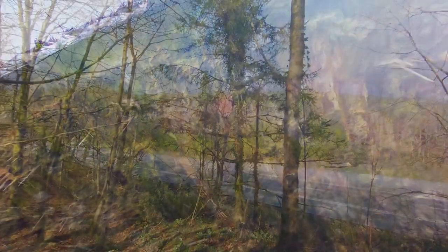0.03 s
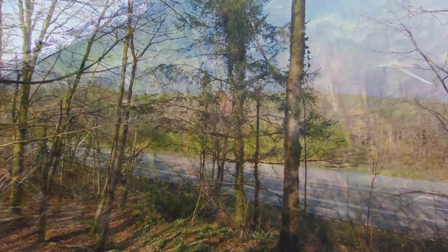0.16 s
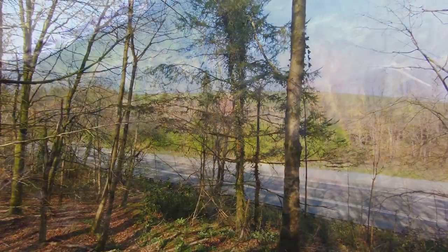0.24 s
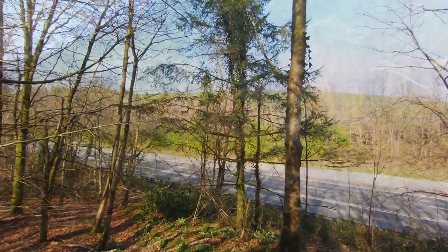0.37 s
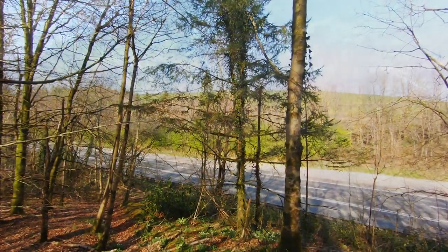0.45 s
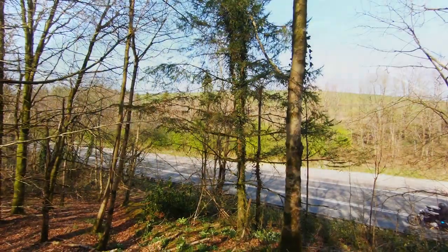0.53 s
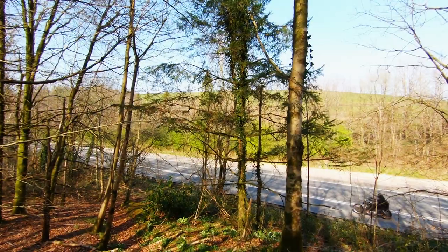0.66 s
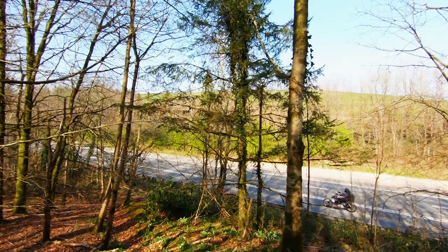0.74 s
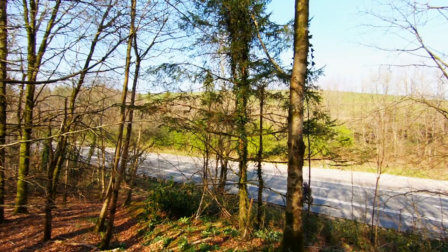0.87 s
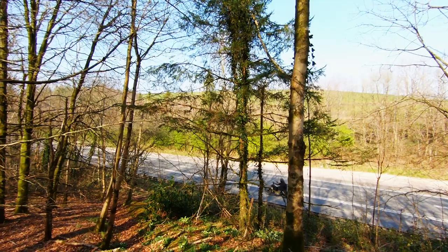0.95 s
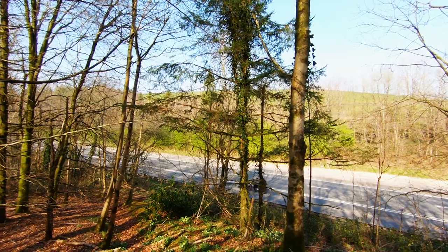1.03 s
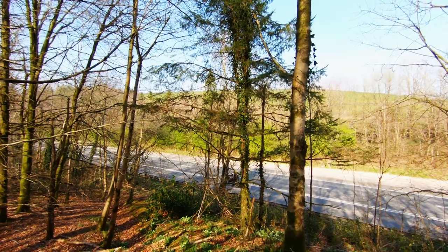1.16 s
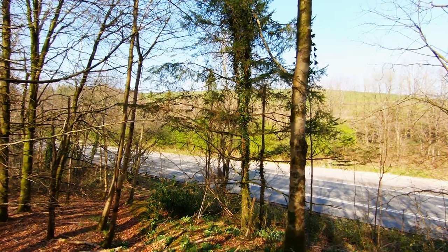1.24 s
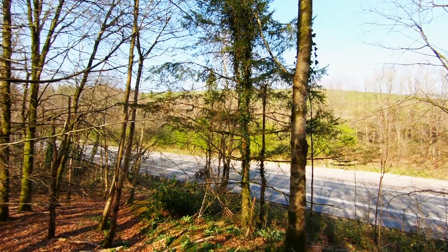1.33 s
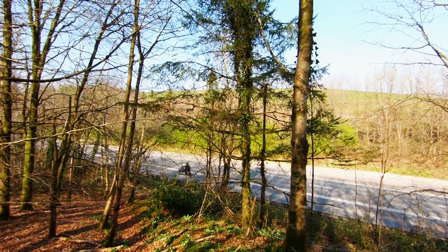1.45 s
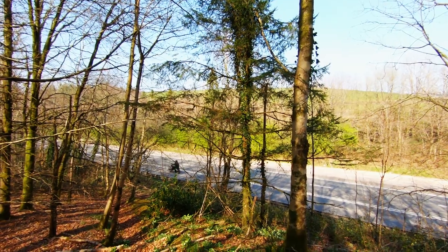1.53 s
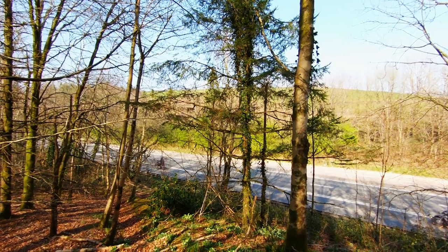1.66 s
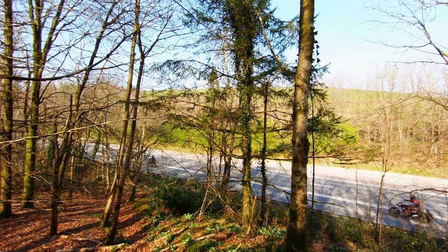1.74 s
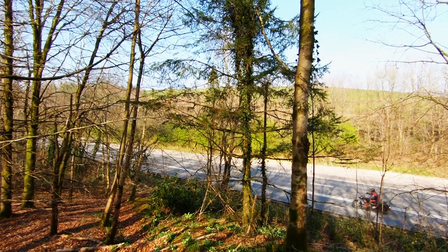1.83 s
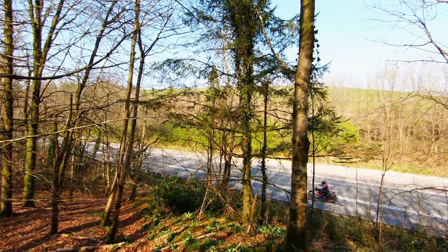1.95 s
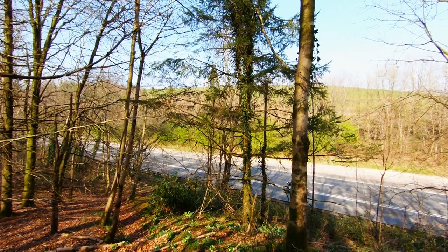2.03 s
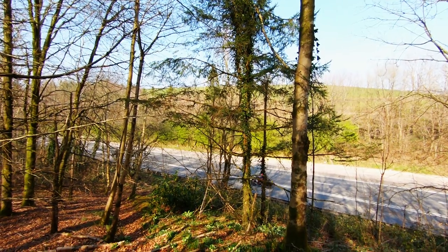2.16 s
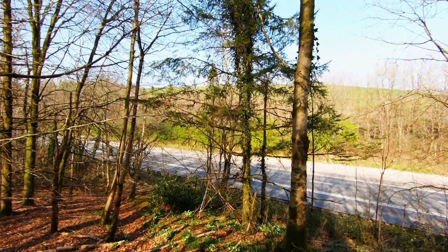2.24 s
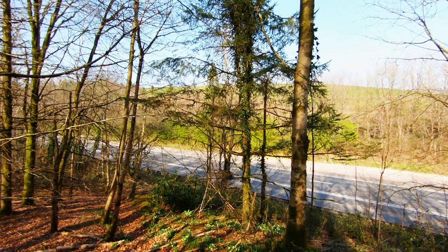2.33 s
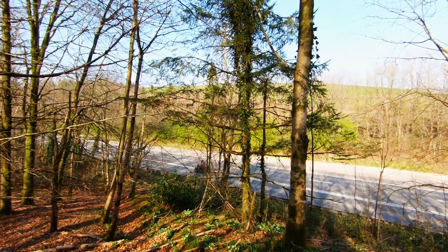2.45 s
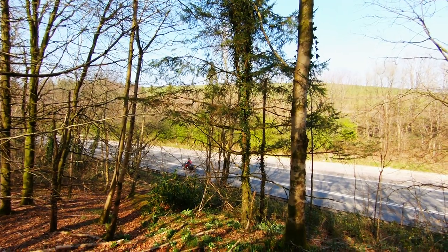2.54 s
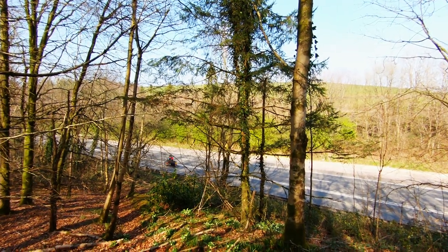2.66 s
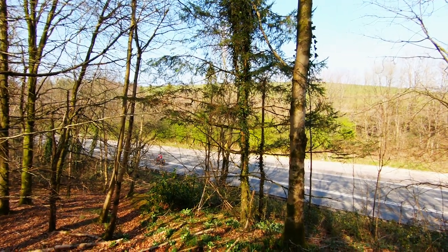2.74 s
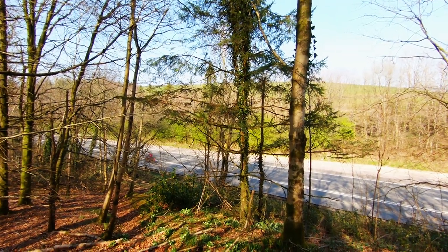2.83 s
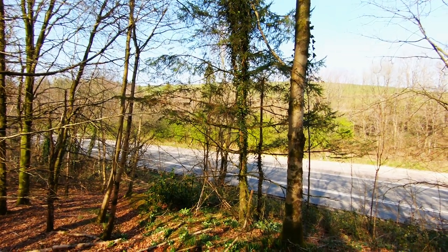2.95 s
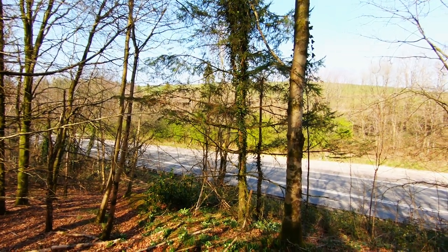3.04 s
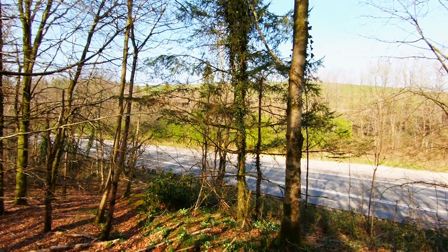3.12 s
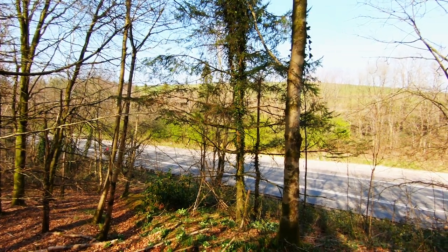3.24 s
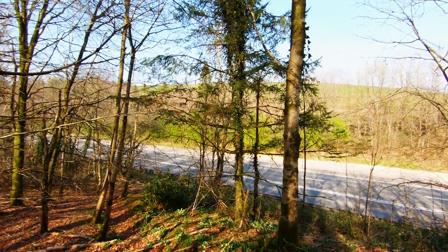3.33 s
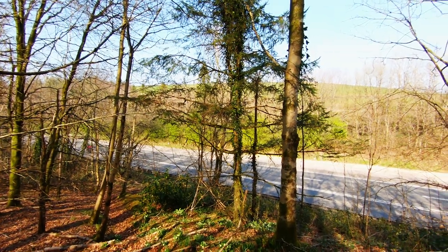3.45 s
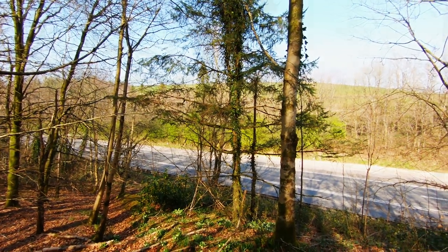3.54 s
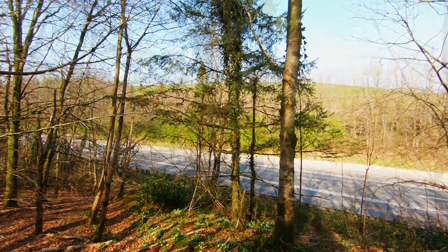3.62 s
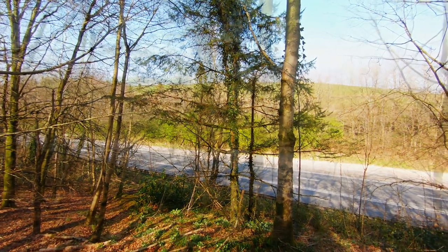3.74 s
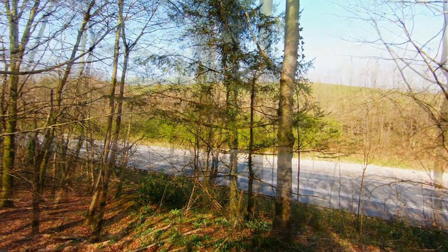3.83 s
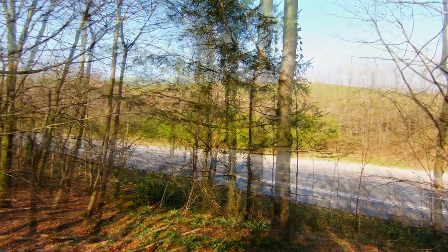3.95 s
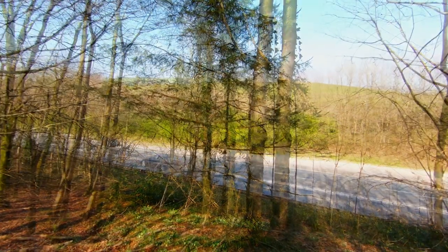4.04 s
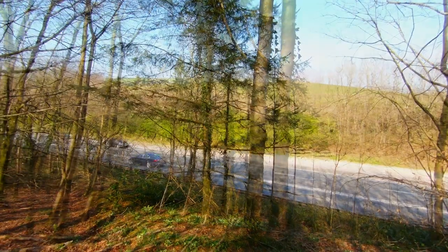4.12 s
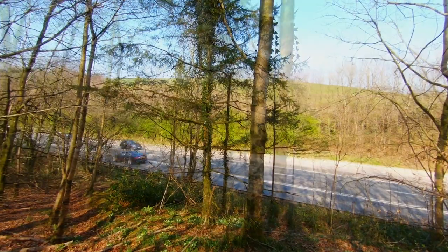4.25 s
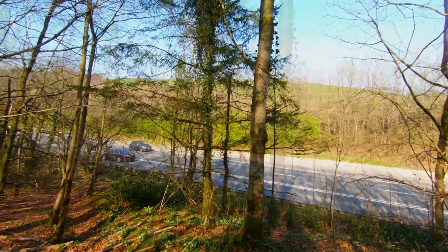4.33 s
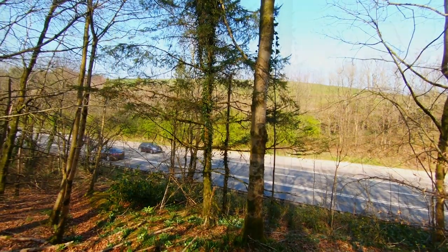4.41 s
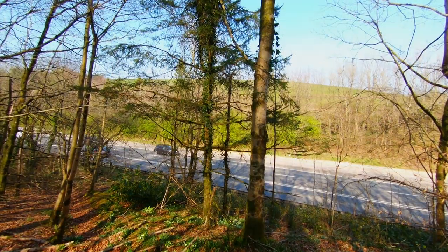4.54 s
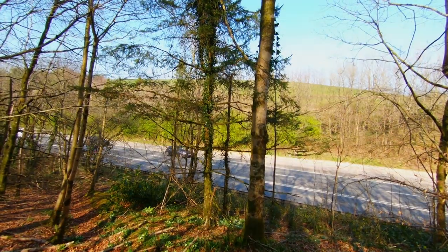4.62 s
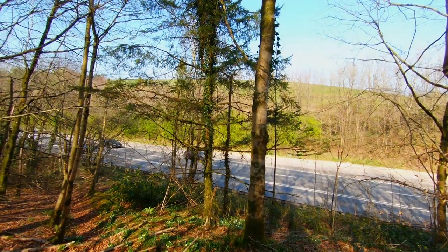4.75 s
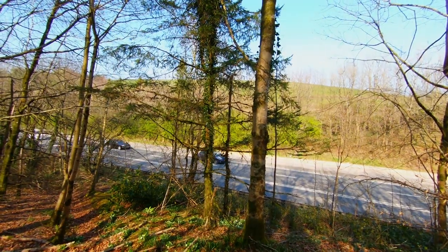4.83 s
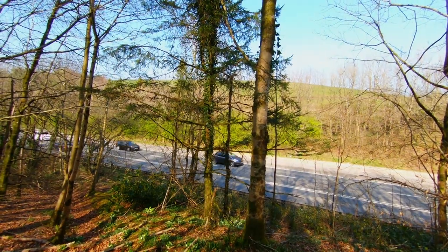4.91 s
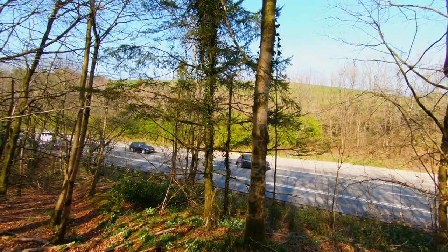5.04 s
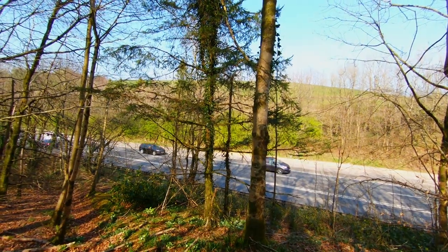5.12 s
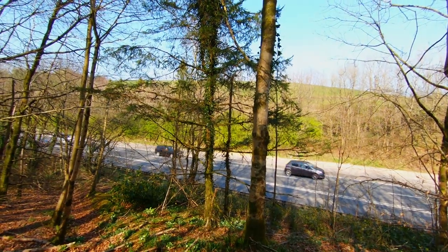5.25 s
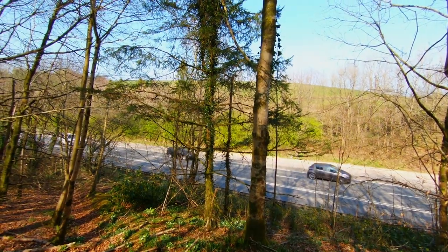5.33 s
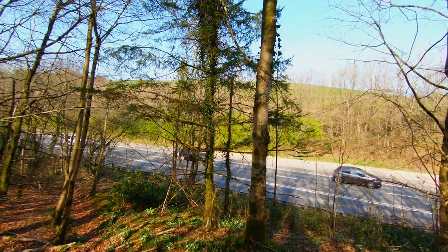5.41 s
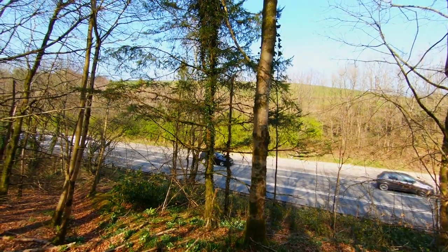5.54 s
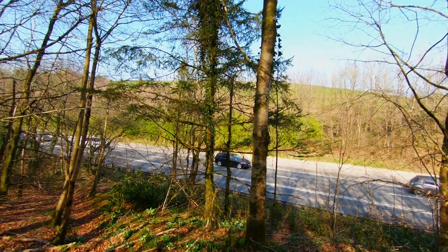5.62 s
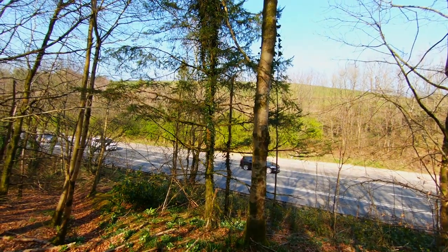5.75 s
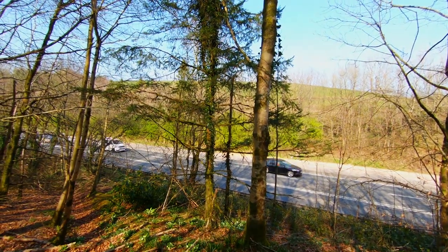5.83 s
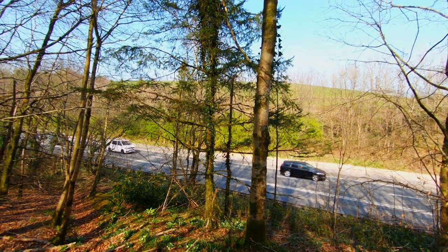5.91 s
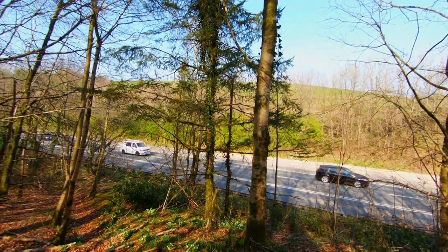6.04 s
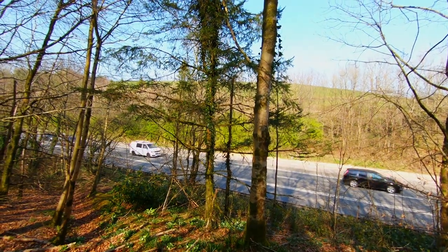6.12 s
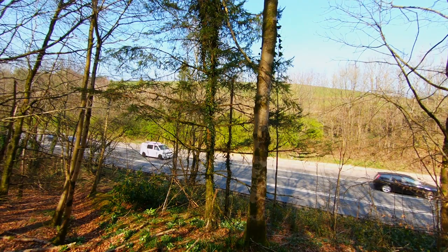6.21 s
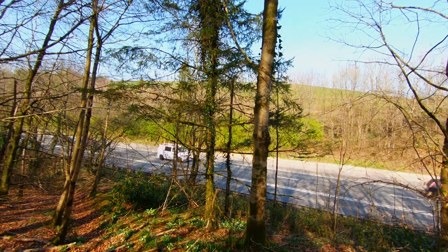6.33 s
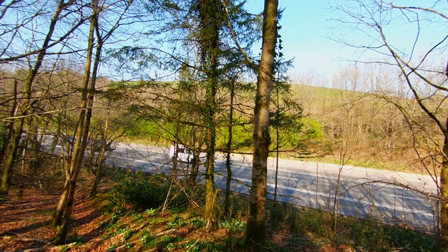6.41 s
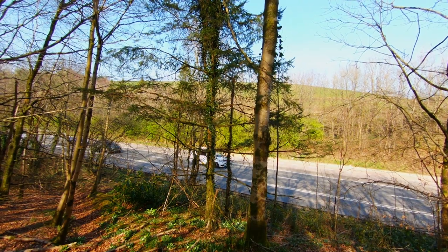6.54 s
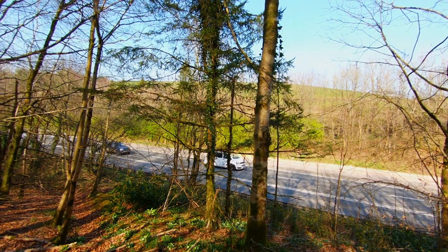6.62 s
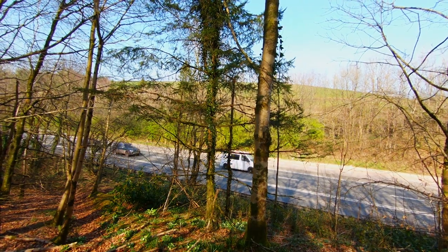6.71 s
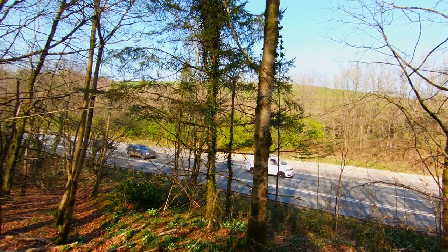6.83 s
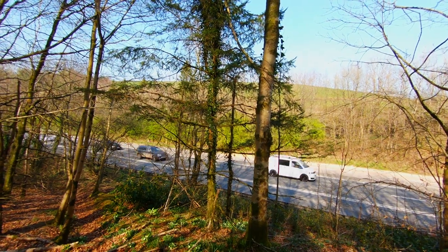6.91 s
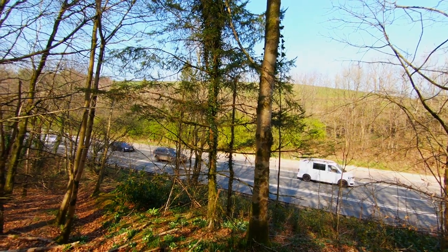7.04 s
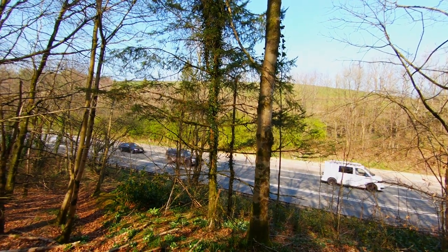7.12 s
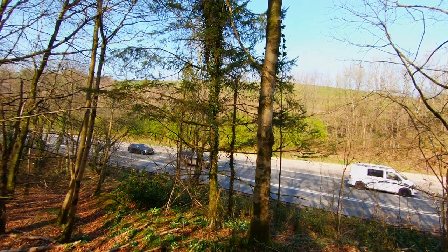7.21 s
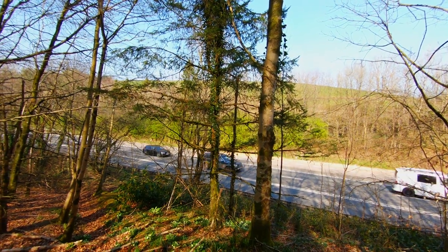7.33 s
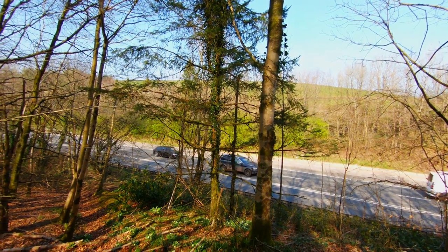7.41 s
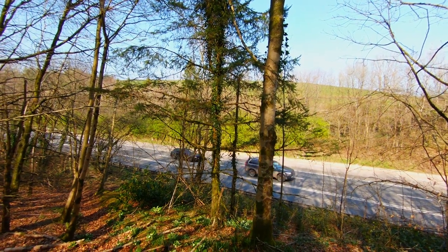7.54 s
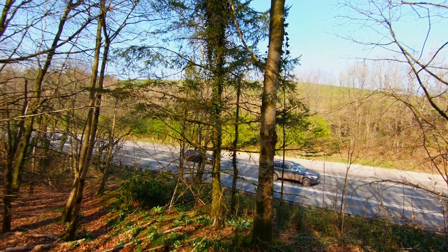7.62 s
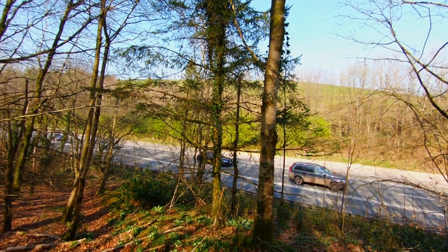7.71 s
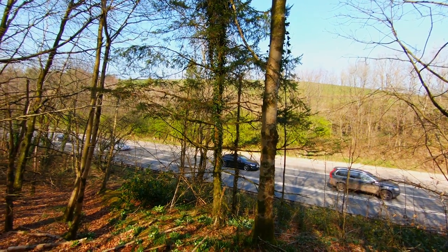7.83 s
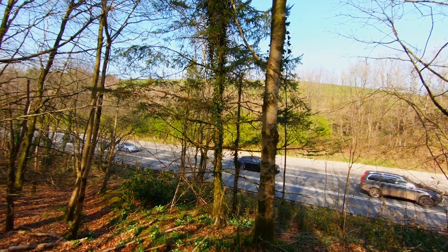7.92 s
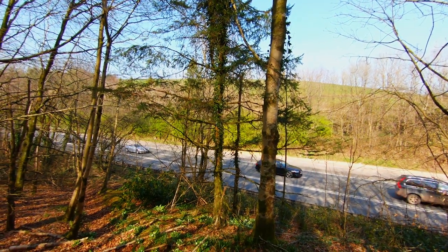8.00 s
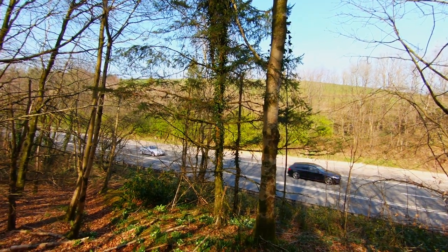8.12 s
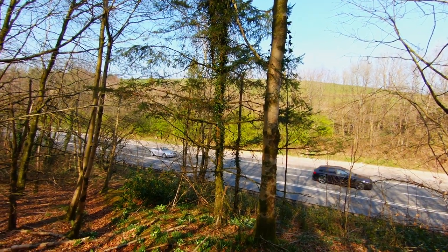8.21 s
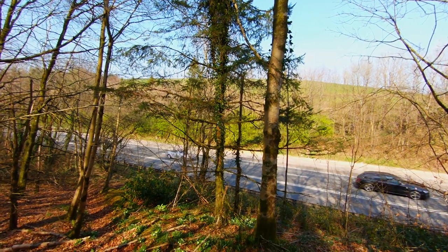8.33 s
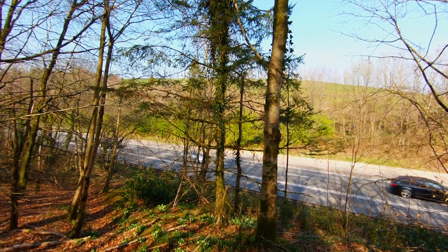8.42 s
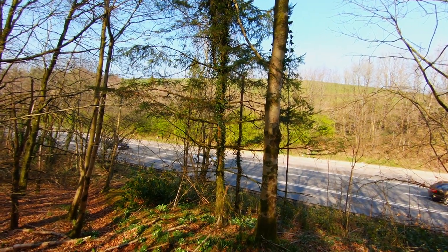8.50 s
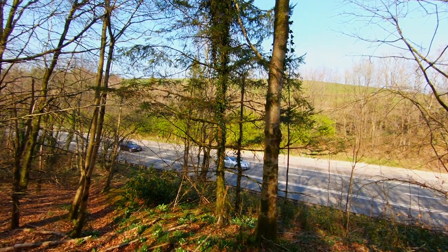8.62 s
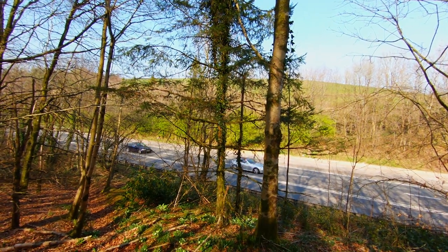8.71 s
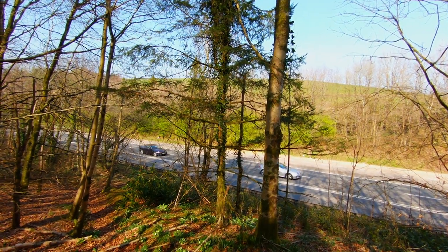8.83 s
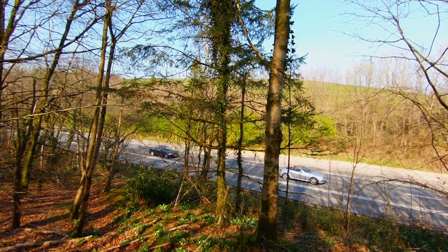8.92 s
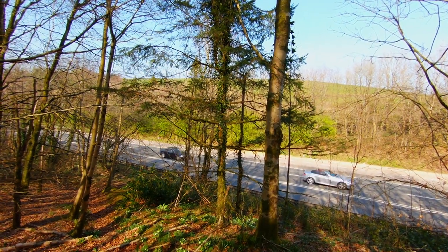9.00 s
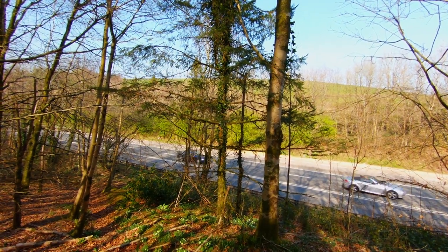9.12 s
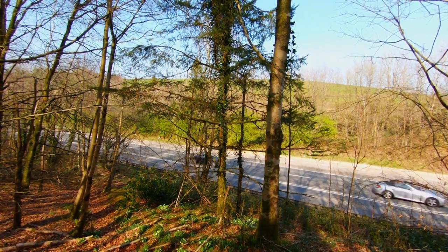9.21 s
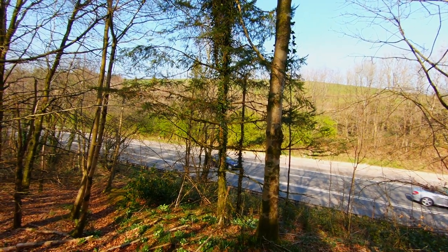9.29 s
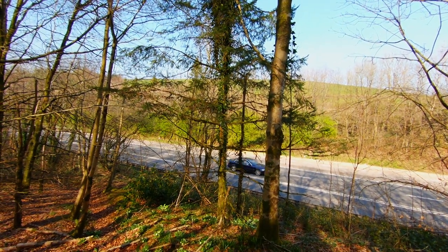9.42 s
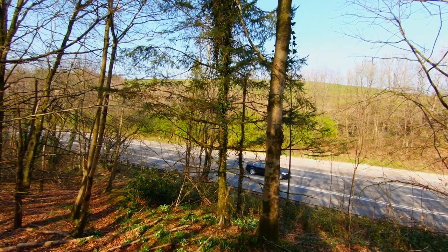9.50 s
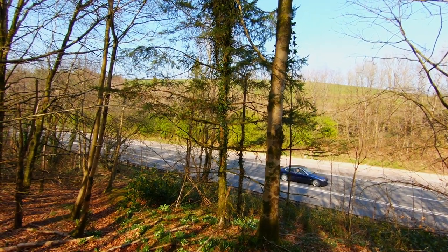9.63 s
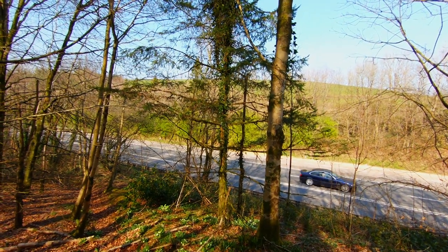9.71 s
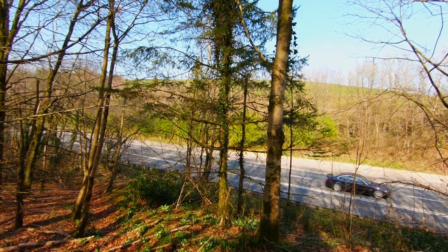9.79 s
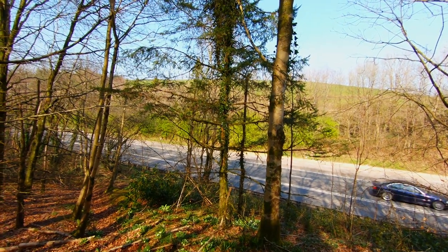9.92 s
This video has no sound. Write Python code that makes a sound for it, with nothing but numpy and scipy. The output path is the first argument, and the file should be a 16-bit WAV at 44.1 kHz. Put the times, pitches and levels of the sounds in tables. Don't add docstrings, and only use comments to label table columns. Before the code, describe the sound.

A rough, uneven motorcycle exhaust swells first, then a smoother one passes and drops slightly in pitch, with roar and light mechanical clatter fading behind trees. A blend leads into steady car traffic: soft waves of tyre noise over a low drone, faint hiss and rare tiny twig ticks. The final car's hum grows close. Outdoor woodland, slightly hollow from slope echoes, single modest microphone.

```python
import sys
import numpy as np
from scipy import signal
from scipy.io import wavfile
from scipy.ndimage import uniform_filter1d, map_coordinates

SR = 44100
rng = np.random.default_rng(int(sys.argv[2]) if len(sys.argv) > 2 else 0)


def voltage_ratio(level):
    return 10 ** (np.asarray(level, float) / 20)


def materialize(psi):
    bounded = np.clip(np.atleast_2d(psi).T, -1, 1)
    quanta = np.round(bounded * 32767).astype(np.int16)
    wavfile.write(sys.argv[1], SR, quanta)


N = 439236
TIME = np.arange(N) / SR
COARSE = np.arange(0, N / SR + .01, .005)

# t/s, f/Hz, level/dB
LAST_CAR_NOTE = [
    (7.4, 201.8, -38),
    (7.7, 201.6, -24),
    (8.25, 208.7, -23),
    (8.6, 210.8, -22),
    (9, 209.6, -27),
    (9.2, 209, -19.5),
    (9.4, 206.5, -15.5),
    (9.7, 203.2, -11),
    (9.96, 206.2, -12.5),
]


def unit(x):
    return x / np.sqrt(np.mean(x ** 2) + 1e-20)


def curves(rows, at=TIME):
    s, *columns = np.transpose(rows)
    return [np.interp(at, s, column) for column in columns]


def wobble(rate, at=TIME):
    knots = rng.standard_normal(int(N * rate / SR) + 4)
    return np.interp(at, COARSE, map_coordinates(knots, [COARSE * rate]))


def fade(t0, t1):
    return np.sin(np.pi / 2 * np.clip((TIME - t0) / (t1 - t0), 0, 1))


def patches(shape, bins, frames):
    field = uniform_filter1d(rng.standard_normal(shape), size=bins, axis=0)
    return unit(uniform_filter1d(field, size=frames, axis=1))


def rush(spectrum, patchy_db, slope=None, bands=(), width=.07):
    hz, t, z = signal.stft(rng.standard_normal(N), SR, nperseg=2048)
    hz = hz[:, None]
    f, db = np.transpose(spectrum)
    z = z * voltage_ratio(np.interp(np.log(hz + 1), np.log(f + 1), db, -120, -120))
    uneven_db = patchy_db * patches(z.shape, 14, 4)
    flicker_db = 2 * np.clip((hz - 9300) / 1000, 0, 2) * patches(z.shape, 12, 2)
    z = z * voltage_ratio(uneven_db + flicker_db)
    if slope:
        spacing_hz, share = curves(slope, t)
        share = np.clip(share, 0, 1) / (1 + (hz / 3300) ** 6)
        comb = np.abs(1 + share * np.exp(2j * np.pi * hz / spacing_hz))
        z = z * comb / np.sqrt(1 + share ** 2)
    for s, length, centre_hz, glide, lift_db in bands:
        off = np.log(hz / np.clip(centre_hz + glide * (t - s), 100, None) + 1e-9) / width
        z = z * voltage_ratio(lift_db * np.exp(-off ** 2 - ((t - s) / length) ** 2))
    return unit(signal.istft(z, SR, nperseg=2048)[1][:N])


def engine(track, orders, fading_db, jitter, stages=(0,), turns=0, bright_db=0, shifts=()):
    hz, db = curves(track)
    hz = hz + sum(shift_hz * np.exp(-((TIME - s) / length) ** 2) for s, length, shift_hz in shifts)
    angle = 2 * np.pi * (np.cumsum(hz) / SR + turns) + jitter * wobble(13)
    start, end = track[0][0], track[-1][0]
    heard = fade(start - .1, start) * fade(end + .1, end)
    note, on = np.zeros(N), heard > 0
    tilt_db = bright_db + 0.084 * (db[on] - db.max())
    for k, *levels in orders:
        octave = np.log2(k * hz[on] / 120)
        fading = fading_db * np.clip(1 + octave, .5, 3) * wobble(2.479, TIME[on])
        level_db = np.interp(TIME[on], stages, levels) + tilt_db * octave + fading
        note[on] += voltage_ratio(level_db) * np.sin(k * angle[on] + rng.uniform(0, 2 * np.pi))
    return voltage_ratio(db) * np.sqrt(2) * note * heard, angle


def passing(start, end, first_hz, last_hz, db, swell_s=.3):
    s = [start, start + swell_s, max(end - swell_s, start + swell_s + .01), end]
    hz = np.interp(s, [start, end], [first_hz, last_hz])
    return np.transpose([s, hz, db - 15 * np.array([1, 0, 0, 1])])


def stream(moments, sizes_db, loss, come_s, go_s):
    late = COARSE - np.array(moments)[:, None]
    far_db = 10 * np.log10(1 + (late / np.where(late < 0, come_s, go_s)) ** 2)
    each = voltage_ratio(np.array(sizes_db)[:, None] - loss * far_db)
    return np.interp(TIME, COARSE, np.linalg.norm(each, axis=0))


def bike_gain(layer):
    bike_moments = [
        0.79,
        1.88,
    ]
    bike_levels = {"roar": (-31, -30, 0.43, -0.5, -11.5), "chain": (-37, -41.5, 0.4352, -2.5, -10.5),
                   "clatter": (-58, -57.5, 0.75, -2, -11.5), "rumble": (-29.5, -35.5, 0.1, -0.5, -5)}
    *sizes_db, loss, hidden_db, opening_db = bike_levels[layer]
    trees_db = hidden_db * fade(3.12, 3.32)
    start_db = opening_db * np.clip(1 - TIME / 0.59, 0, 1)
    near = stream(bike_moments, sizes_db, loss, come_s=0.19, go_s=.26)
    return near * voltage_ratio(trees_db + start_db) * fade(4.09, 3.36)


def exhausts():
    # t/s, cycle f/Hz, level/dB
    twin_track = [
        (0, 24.9, -36),
        (.2, 24.32, -31.5),
        (.7, 23.47, -24),
        (1.2, 22.7, -25.5),
        (1.6, 22.28, -27),
        (2.0, 22.12, -29.5),
        (2.7, 22, -30),
        (3.75, 21.9, -29.5),
        (4.05, 22.1, -38),
    ]
    twin_orders = [(2.007, -4.5, -10, -12.5), (2.994, -10, -5.5, -5.5), (4.02, -1, -8, -14),
                   (5.022, 0, 3, -1.5), (6.14, -4.5, -24, -14.5), (6.97, -6.5, -19, -26),
                   (7.93, -18, -12, -17.5), (8.8, -11, -19.5, -21.5), (10.09, -22.5, -20.5, -16.5),
                   (11.07, -7, -19, -14), (12.1, -12.5, -8.5, -6), (13.02, -9.5, -16.5, -8.5),
                   (14.07, -20, -16, -9), (15.96, -15.5, -22, -15), (19, -31, -20, -20),
                   (22, -17.5, -18.5, -18.5)]
    # t/s, firing f/Hz, level/dB
    smooth_track = [
        (.1, 65.4, -39),
        (.55, 64.96, -26),
        (1.3, 64.37, -23),
        (1.9, 62.2, -20.5),
        (2.2, 59.95, -21),
        (2.7, 58.7, -24),
        (3.2, 57.8, -25),
        (3.5, 56.45, -24),
        (3.85, 55.6, -30.5),
    ]
    smooth_orders = [(1, -5.5, -4, -4.5, -10), (2, 0.5, 1, 3.5, 0.5), (3, -8, -11.5, -15.5, -11),
                     (4, -17.5, -19, -23, -10.5), (5, -18.5, -9.5, -23.5, -13.5), (6, -24, -19, -29.5, -21),
                     (7, -34, -24.5, -25, -24.5), (8, -22, -26.5, -27, -24), (9, -20.5, -24.5, -21.5, -25),
                     (10, -23, -30, -18.5, -29), (11, -24.5, -29, -18.5, -27.5), (12, -30.5, -32, -21, -21),
                     (13, -24.5, -26, -18, -24)]
    twin_stages = [0.68, 1.1, 3.1]
    smooth_stages = [1.2, 1.95, 2.55, 3.1]
    # t/s, length/s, shift/Hz
    gear_change = (2.94, .13, -2.4)
    pitch_lifts = [(1.1, .2, .7), (1.8, .45, .31)]
    # start/s, end/s, first f/Hz, last f/Hz, level/dB
    howl_pass = (.43, .88, 64.3, 63.3, -37.5)
    # f/multiple, level/dB
    howl_orders = [(7, -3), (10, -3), (11, 0), (12, -2), (13, 0)]
    twin, twin_angle = engine(twin_track, twin_orders, fading_db=0.04, jitter=0.014,
                              stages=twin_stages, bright_db=-2.3, turns=.1)
    smooth, smooth_angle = engine(smooth_track, smooth_orders, fading_db=0.7, jitter=0.063,
                                  stages=smooth_stages, turns=0.1494, bright_db=1.2,
                                  shifts=[gear_change, *pitch_lifts])
    howl = engine(passing(*howl_pass, swell_s=.12), howl_orders, fading_db=.2, jitter=.05)[0]
    return twin + smooth + howl, twin_angle, smooth_angle


def motorcycles():
    # f/Hz, level/dB per Hz
    roar_colour = [(200, -37.5), (330, -4), (450, -2), (760, 1.5), (1200, -1.5), (1700, -10.5),
                   (2300, -36.5)]
    chain_colour = [(1200, -36.5), (1700, -0.5), (2300, -4.5), (2900, -7.5), (4300, -12.5), (5000, -15),
                    (5700, -25), (6500, -54.5)]
    clatter_colour = [(5000, -27.5), (5900, 0.5), (7400, 0), (8500, -4), (9500, -9.5), (10500, -18.5),
                      (12000, -26.5), (14300, -51)]
    # t/s, length/s, f/Hz, glide/Hz per s, lift/dB
    pipe_bands = [(0.39, 0.32, 1440, -40.5, 8.5), (1.61, 0.52, 1470, -60.5, 7.5),
                  (.65, 0.13, 760, -40.5, 4.5), (0.49, .2, 490, -31.5, 3.5), (3.2, .5, 940, -30, 3.5),
                  (2.6, 0.58, 890, -31, 3.5)]
    chain_bands = [(.27, .14, 4520, 55.5, 9.3), (.68, .13, 4460, -1500, 4.4), (.98, 0.23, 4020, -53, 5.5),
                   (2.85, 0.4, 2150, -58, 7), (3.5, 0.31, 2400, 28.5, 6), (3.05, 0.23, 2980, 30, 6.6)]
    valve_bands = [(.9, .3, 7850, -2200, 7), (2.1, 0.4, 7800, -2500, 5), (2.2, .9, 12400, 299, 10),
                   (3.2, .5, 8250, -200, 2)]
    # t/s, comb spacing/Hz, echo share/0-1
    bike_slope = [(0, 1320, 0), (.4, 1274, 0), (.9, 1060, .25), (1.4, 720, 0), (1.8, 681, 0),
                  (2.3, 753, 0.24), (2.9, 740, .5), (3.6, 760, 0.4), (4.05, 755, 0.1)]
    notes, twin_angle, smooth_angle = exhausts()
    lumps = np.cos(twin_angle) + 1.4 * np.cos(2 * twin_angle + 0.96)
    puffs = np.cos(smooth_angle) + 0.99 * np.cos(2 * smooth_angle)
    roar = rush(roar_colour, patchy_db=0.5, slope=bike_slope, bands=pipe_bands, width=0.2)
    roar = unit(voltage_ratio(.15 * lumps + 1.0 * puffs) * roar)
    chain = rush(chain_colour, patchy_db=1.27, slope=bike_slope, bands=chain_bands, width=0.083)
    chain = unit(voltage_ratio(0.72 * lumps + .5 * puffs) * chain)
    clatter = rush(clatter_colour, patchy_db=1.5, bands=valve_bands, width=.09)
    clatter = unit(voltage_ratio(0.83 * lumps + .6 * puffs + .6 * wobble(8.8)) * clatter)
    noise = bike_gain("roar") * roar + bike_gain("chain") * chain + bike_gain("clatter") * clatter
    return notes + noise


def car_gain(layer):
    # t/s, size/dB
    car_passes = [
        (4.55, -4),
        (5.52, 1),
        (6.25, 0.8),
        (7.25, 0),
        (7.95, -1.3),
        (8.35, -3),
        (9.2, 0.8),
        (9.86, -1.5),
    ]
    car_levels = {"tyre": (-24, 0.41, -.05, 4.5, 0.52), "hiss": (-40.5, 0.48, -.5, 4.5, 0.04),
                  "spray": (-65.5, 1, -0.25, 4.5, 0.5), "rumble": (-26.5, 0.34, .1, 4.5, 0.2)}
    db, loss, drift, full_s, duck = car_levels[layer]
    s, sizes_db = np.transpose(car_passes)
    duck_db = duck * np.clip(curves(LAST_CAR_NOTE)[1] + 16.5, 0, None)
    near = stream(s, loss * sizes_db, loss, come_s=.3, go_s=.24)
    return near * voltage_ratio(db + drift * (TIME - 4) - duck_db) * fade(3.687, full_s)


def rumble():
    # f/Hz, level/dB per Hz
    low_colour = [(12, -61), (20, -34), (32, -19), (56, -7.5), (81, 3), (178, -5.5), (220, -5), (293, -10),
                  (450, -16), (580, -43.5), (990, -120)]
    return np.hypot(bike_gain("rumble"), car_gain("rumble")) * rush(low_colour, patchy_db=1.0)


def cars():
    # f/Hz, level/dB per Hz
    tyre_colour = [(240, -49), (400, -13.5), (555, -11.5), (673, -4.5), (779, -0.5), (922, -1.5),
                   (1030, -7.5), (1290, -11.5), (1700, -27.5), (2210, -59), (3740, -120)]
    hiss_colour = [(940, -39.5), (1600, -2.5), (1920, -2.5), (2420, -9), (3680, -16.5), (5170, -25.5),
                   (5560, -30.5), (7230, -54.5), (12200, -120)]
    spray_colour = [(5000, -28.5), (5900, -4), (7300, 2), (8400, -4), (9500, -9.5), (10400, -25.5),
                    (11200, -26), (14000, -56)]
    # t/s, length/s, f/Hz, glide/Hz per s, lift/dB
    tyre_bands = [(6.45, 0.39, 1050, 50, 3.5), (6.1, .4, 560, 30, 3), (3.9, 0.47, 2400, 30, 4.9)]
    tread_bands = [(4.95, .6, 1840, 30, 5), (5.65, 0.17, 1900, 400, 3.5), (7.3, 0.14, 2100, 30, 3.5),
                   (4.6, .3, 2635, 60, 4)]
    # t/s, comb spacing/Hz, echo share/0-1
    car_slope = [(3.7, 667, 0.44), (4.5, 655, 0.36), (5.1, 658, 0.24), (5.7, 694, 0.11), (6.1, 696, 0.061),
                 (7, 724, 0.19), (7.3, 706, .25), (7.7, 730, 0.13), (9.96, 713, 0.092)]
    # start/s, end/s, first f/Hz, last f/Hz, level/dB
    first_car = (4, 6, 137, 129.6, -26.5)
    other_cars = [
        (4.205, 6.898, 66.6, 63.8, -32.5),
        (4.2, 5.707, 110.2, 100, -30.5),
        (6.3, 8.5, 91.84, 70, -27),
        (6.443, 7.596, 233.5, 224, -33),
        (8.247, 9.595, 125.1, 117.5, -30.5),
    ]
    # f/multiple, level/dB
    first_orders = [(1, 0), (2, -13)]
    last_orders = [(1, -3), (1.667, -25)]
    tyre = rush(tyre_colour, patchy_db=1.03, slope=car_slope, bands=tyre_bands, width=0.21)
    hiss = rush(hiss_colour, patchy_db=0.47, slope=car_slope, bands=tread_bands, width=0.084)
    spray = rush(spray_colour, patchy_db=.5)
    noise = car_gain("tyre") * tyre + car_gain("hiss") * hiss + car_gain("spray") * spray
    first = engine(passing(*first_car), first_orders, fading_db=3.0, jitter=0.16)[0]
    last = engine(LAST_CAR_NOTE, last_orders, fading_db=-0.2, jitter=0.058)[0]
    others = sum(engine(passing(*car), [(1, 0.0024)], fading_db=3.2, jitter=.6)[0] for car in other_cars)
    return noise + first + last + others


def twigs():
    # t/s, peak level/dB
    ticks = [
        (3.79, -60),
        (6.555, -66),
        (7.25, -69),
    ]
    out, t = np.zeros(N), np.arange(300) / SR
    for s, db in ticks:
        decay = voltage_ratio(db - 60 * t / .006)
        out[round(s * SR):][:len(t)] += decay * rng.standard_normal(len(t))
    bright = signal.butter(2, [6000, 11000], "bandpass", fs=SR, output="sos")
    return signal.sosfilt(bright, out)


def scene():
    return (motorcycles() + rumble() + cars() + twigs())[None]


def top_cut(x):
    return signal.sosfilt(signal.butter(12, 14300, fs=SR, output="sos"), x)


def record(dry):
    return top_cut(dry)


dry = scene()
out = record(dry)
materialize(out)
```